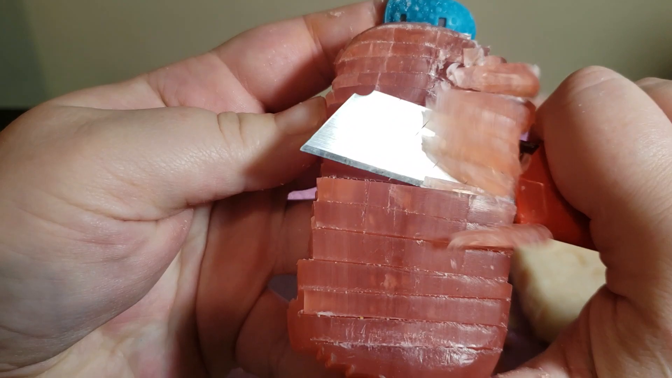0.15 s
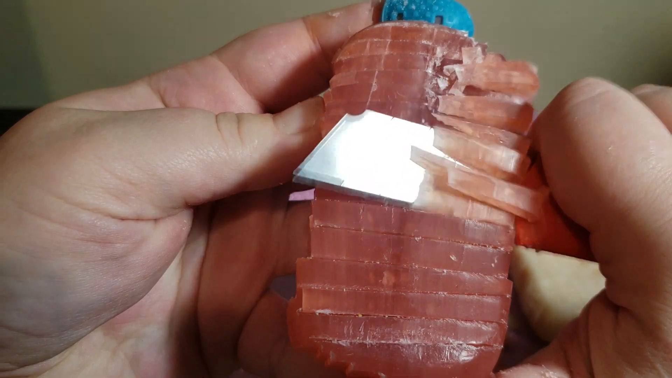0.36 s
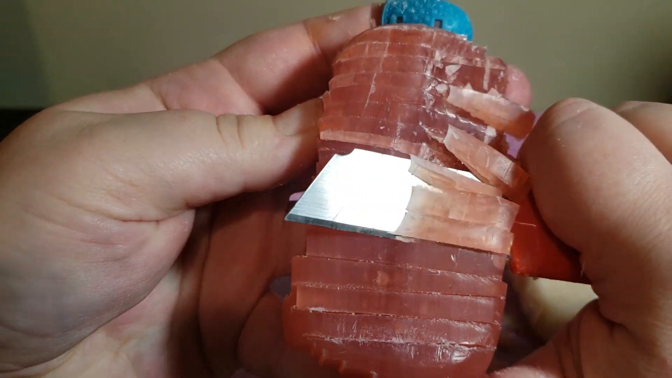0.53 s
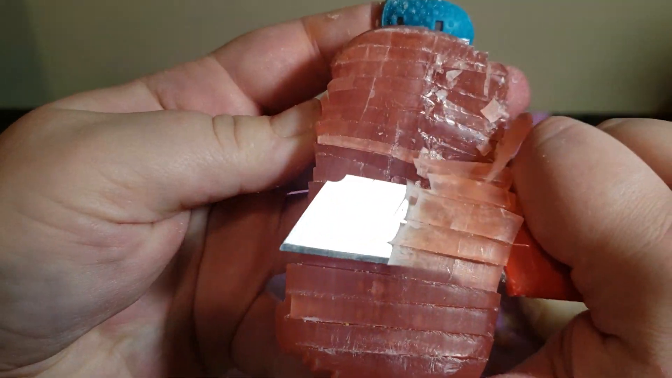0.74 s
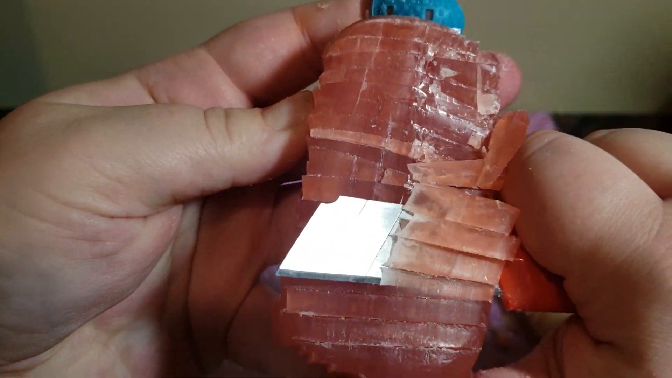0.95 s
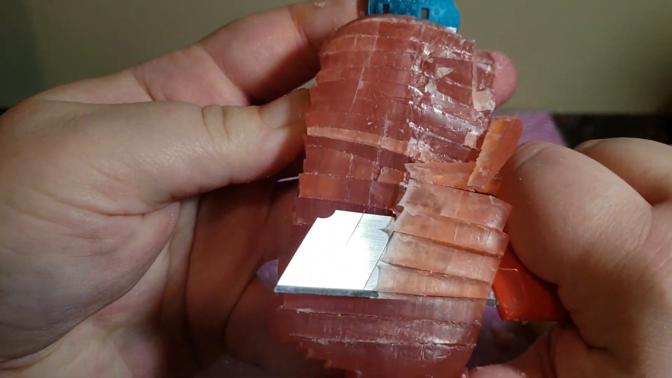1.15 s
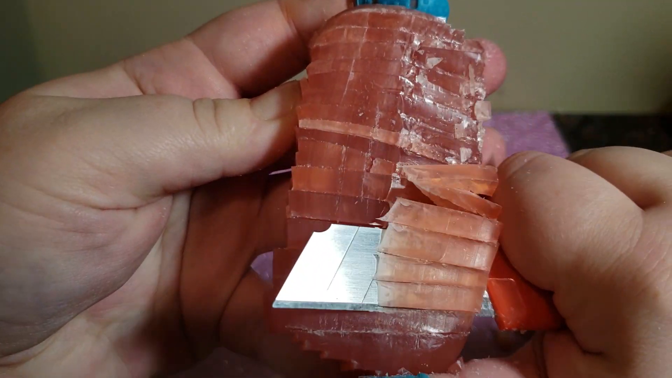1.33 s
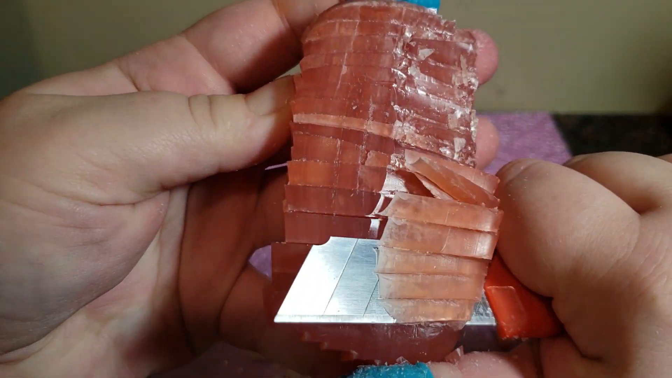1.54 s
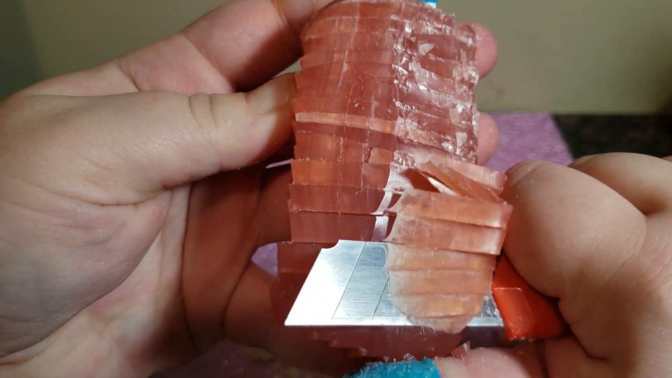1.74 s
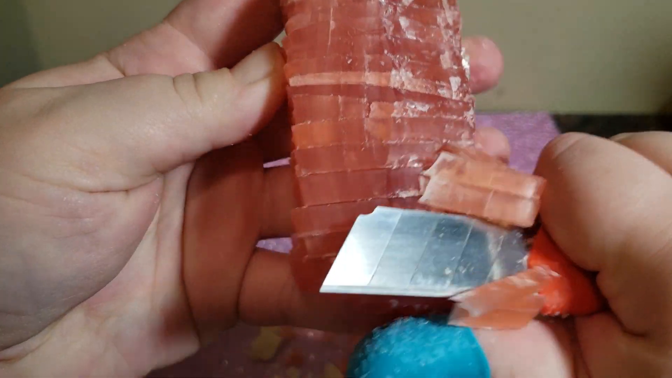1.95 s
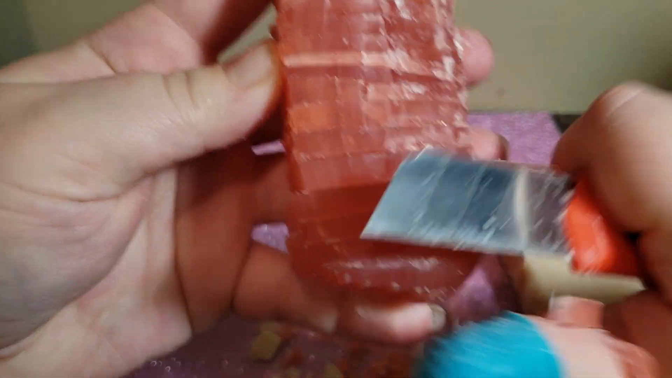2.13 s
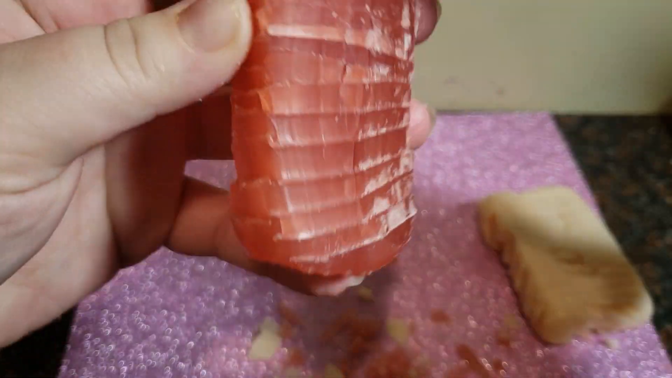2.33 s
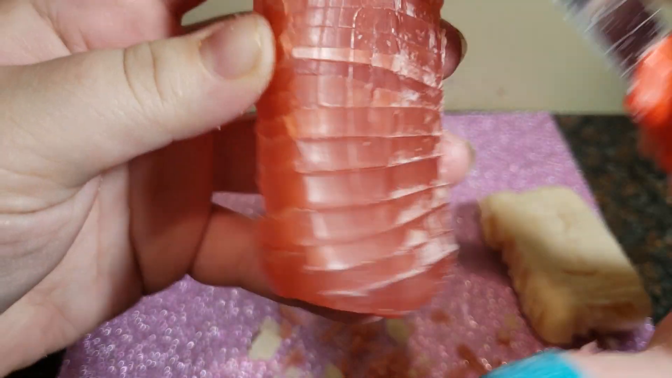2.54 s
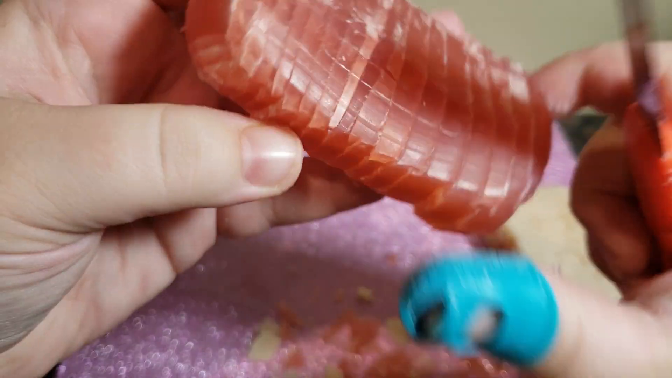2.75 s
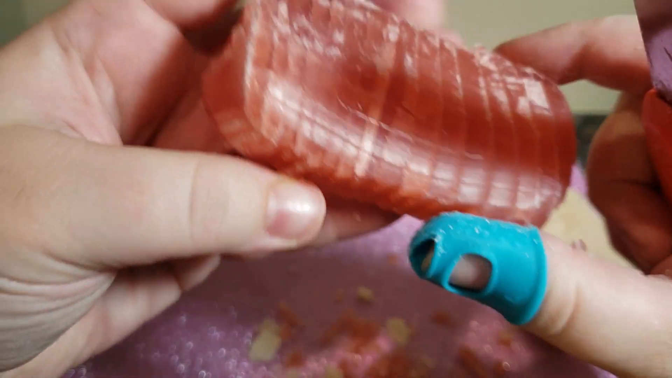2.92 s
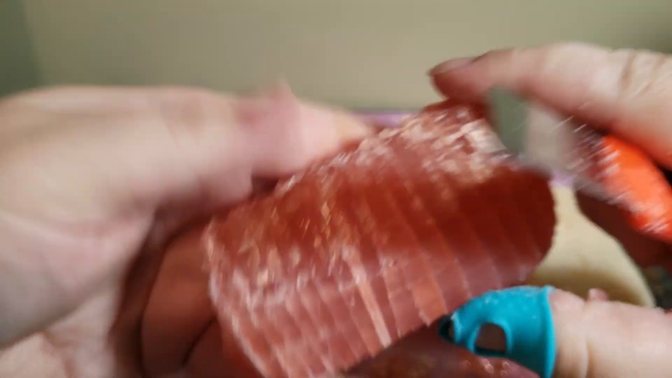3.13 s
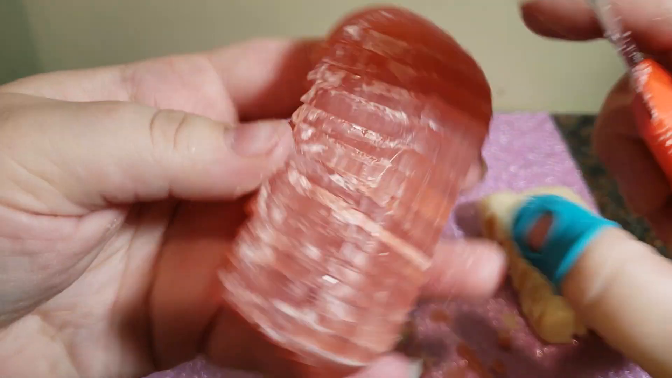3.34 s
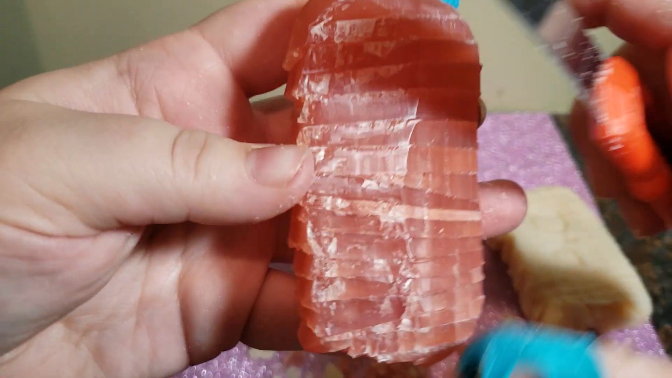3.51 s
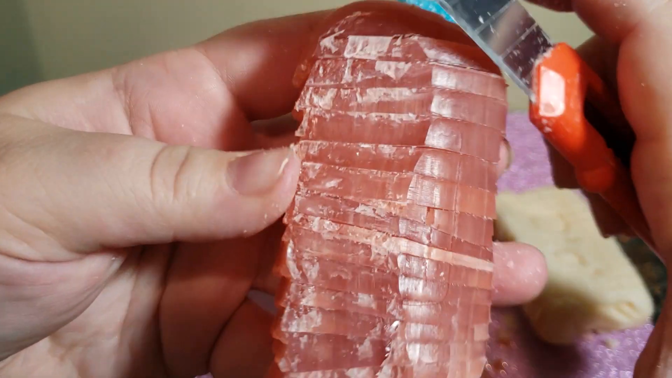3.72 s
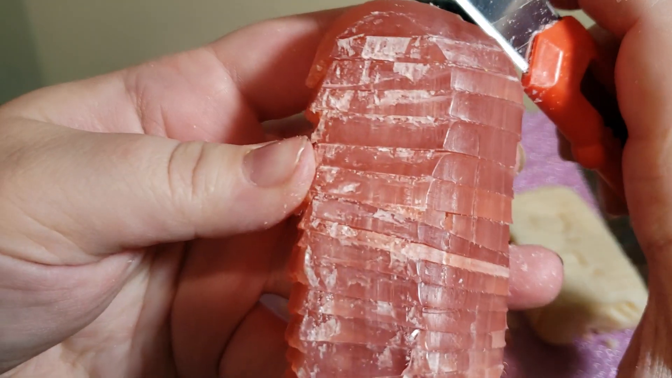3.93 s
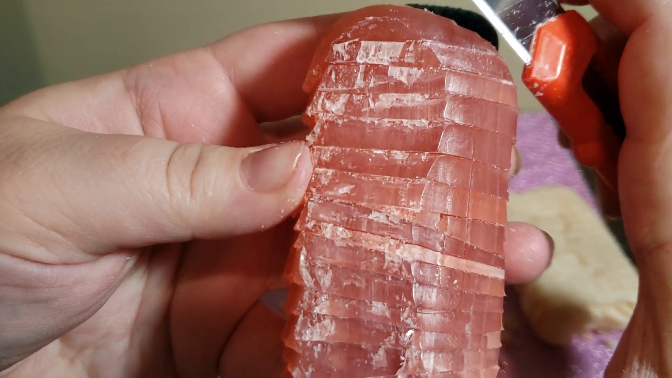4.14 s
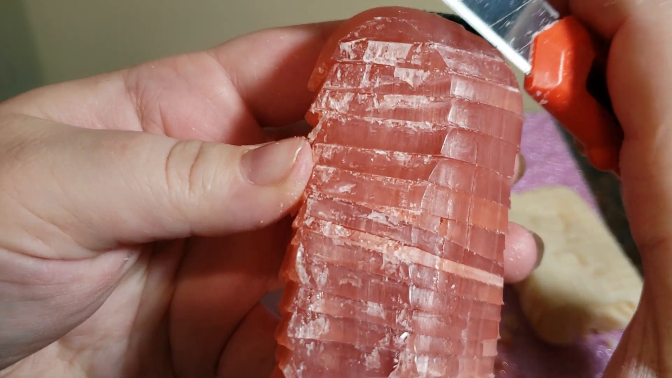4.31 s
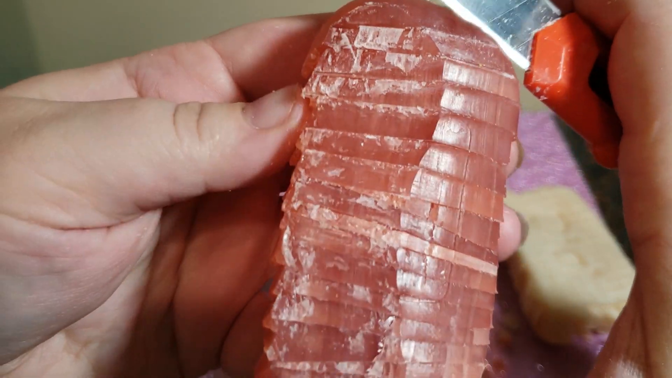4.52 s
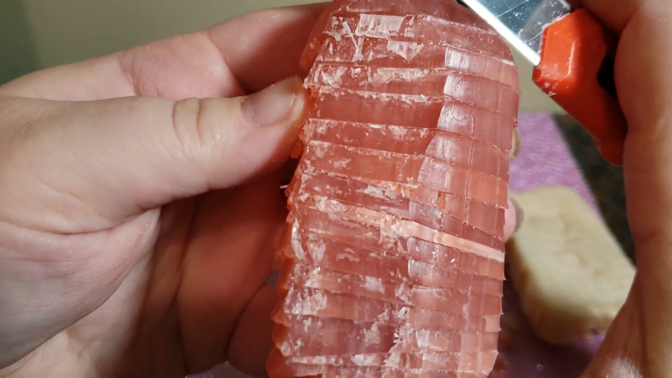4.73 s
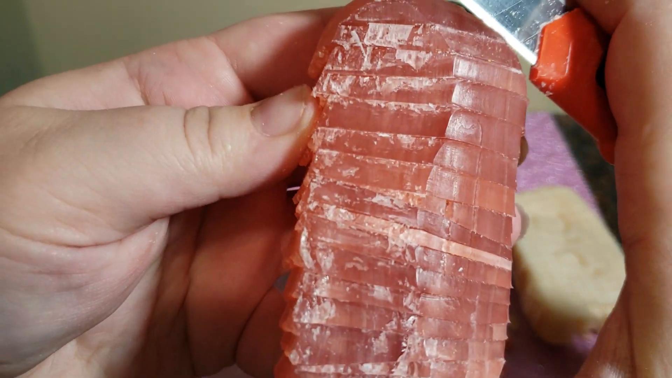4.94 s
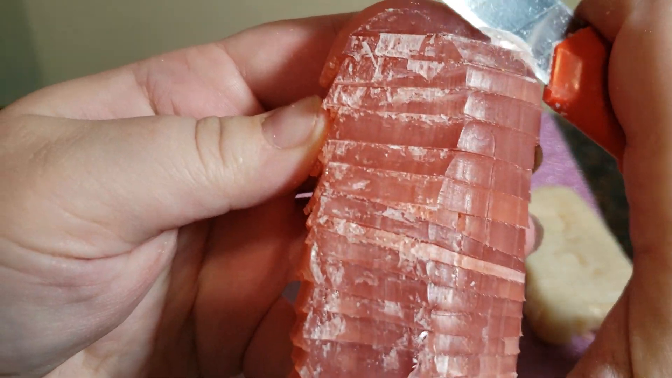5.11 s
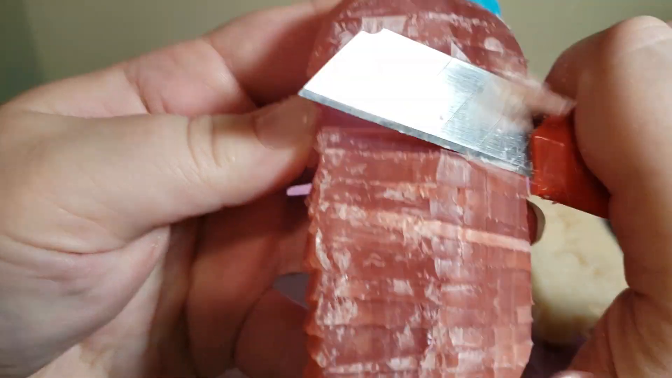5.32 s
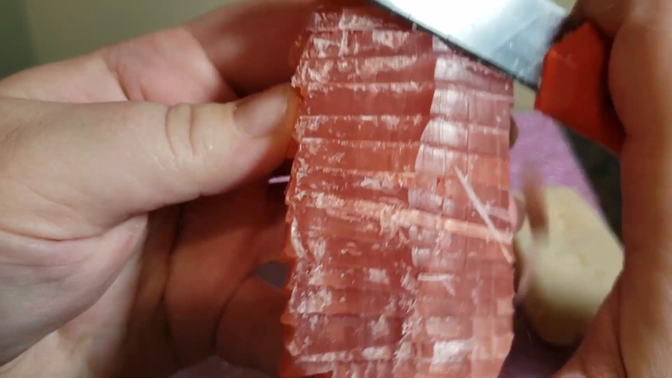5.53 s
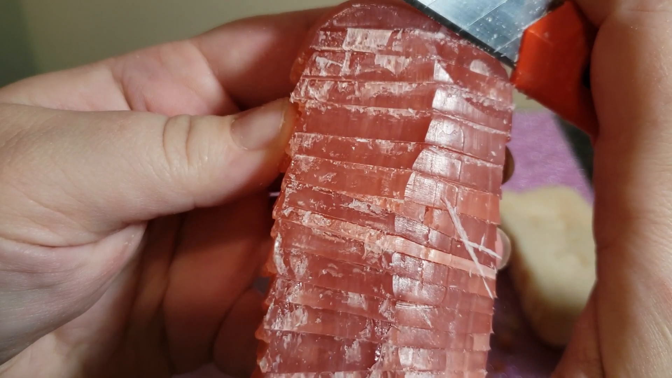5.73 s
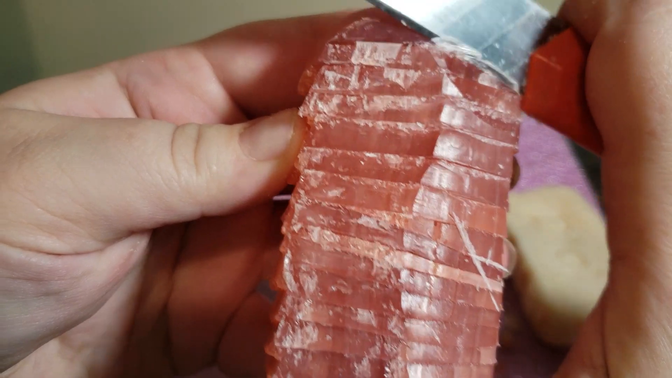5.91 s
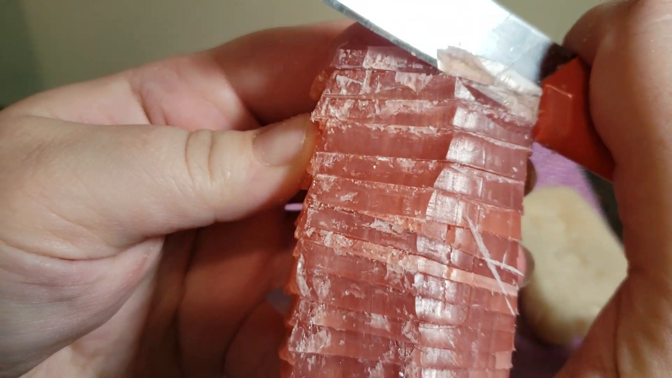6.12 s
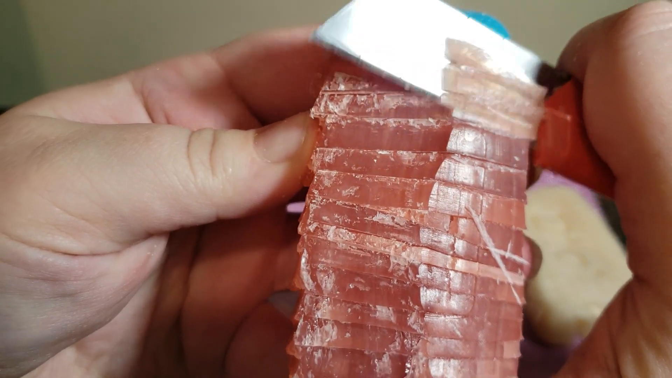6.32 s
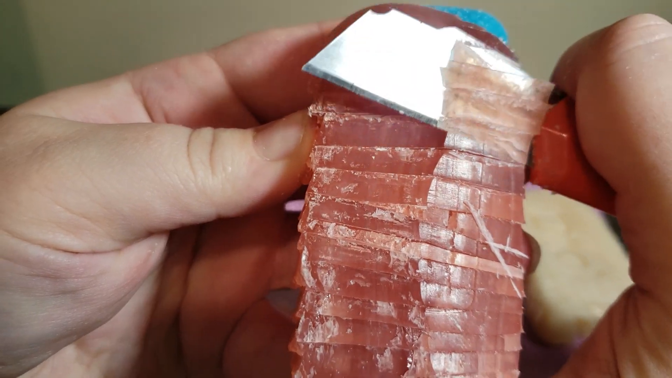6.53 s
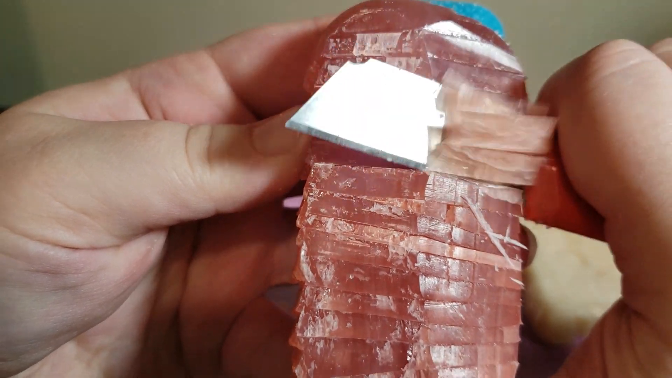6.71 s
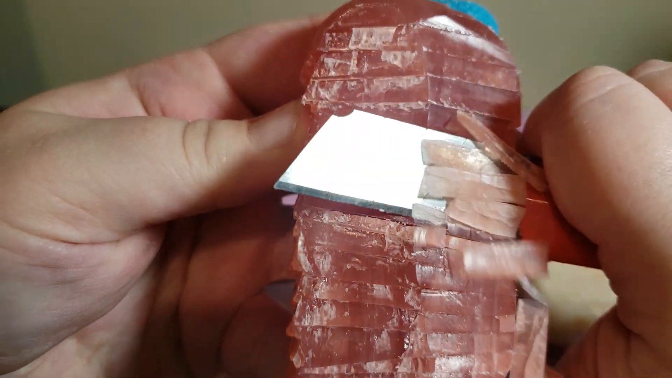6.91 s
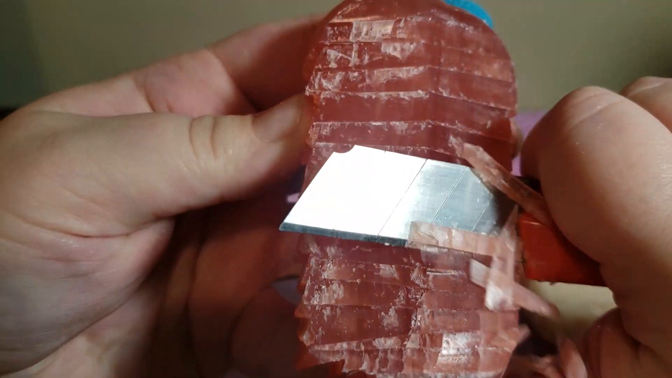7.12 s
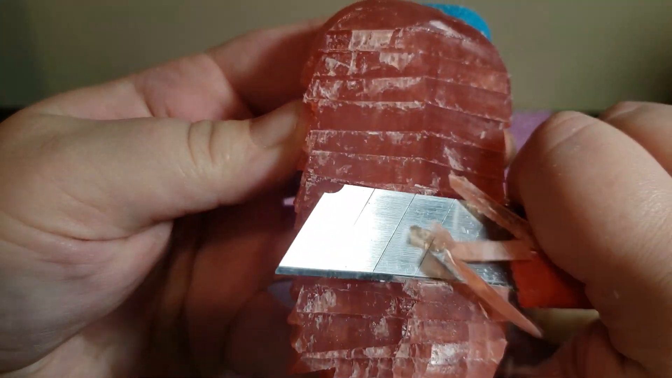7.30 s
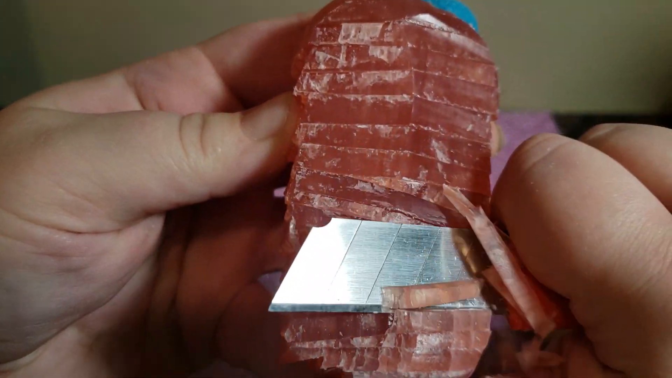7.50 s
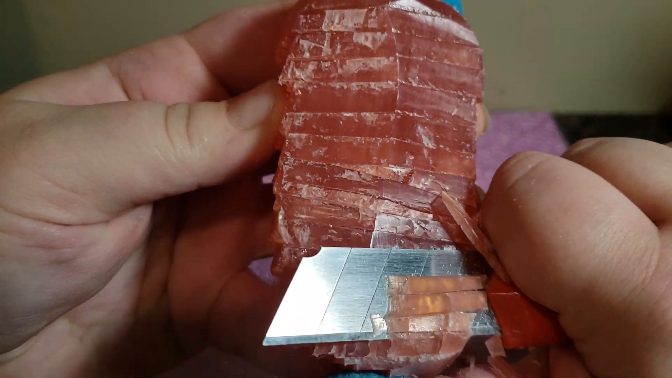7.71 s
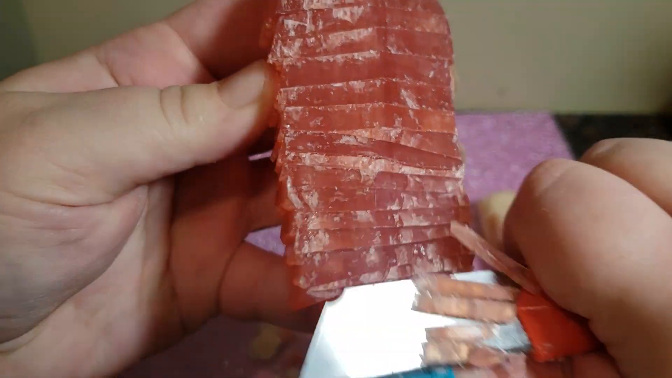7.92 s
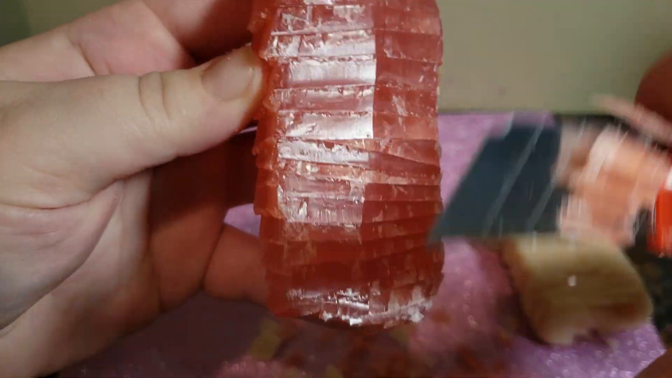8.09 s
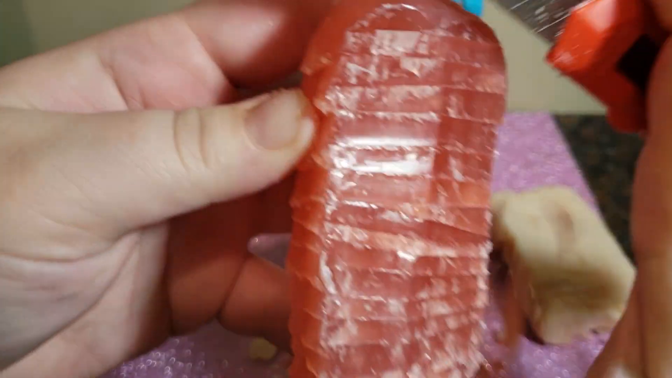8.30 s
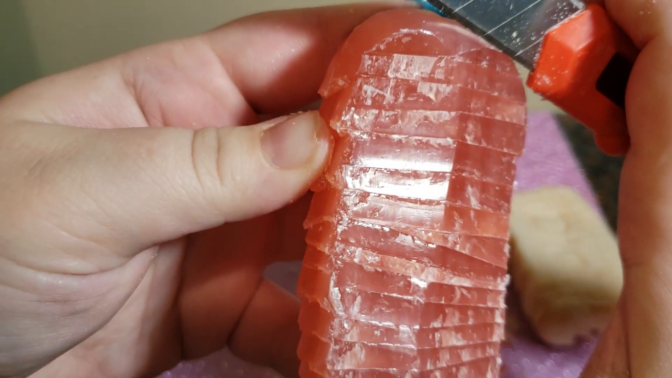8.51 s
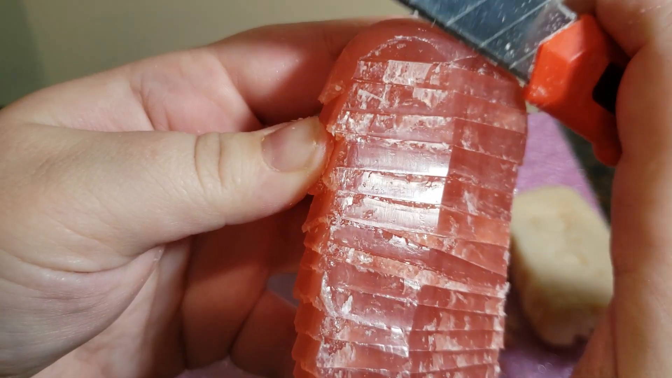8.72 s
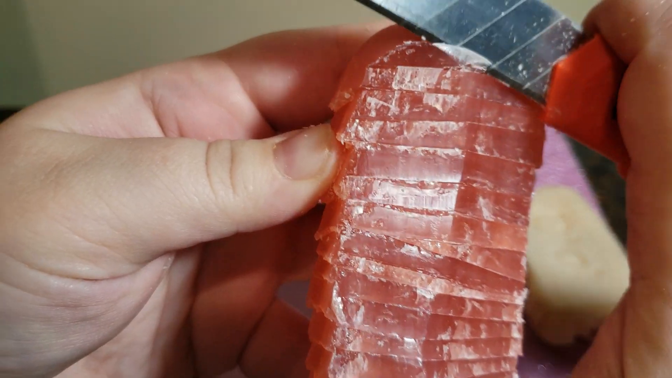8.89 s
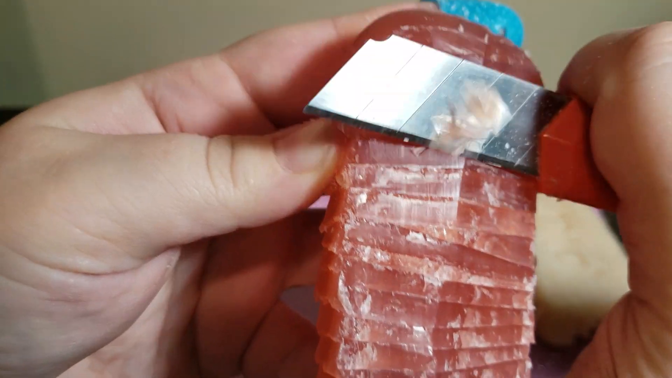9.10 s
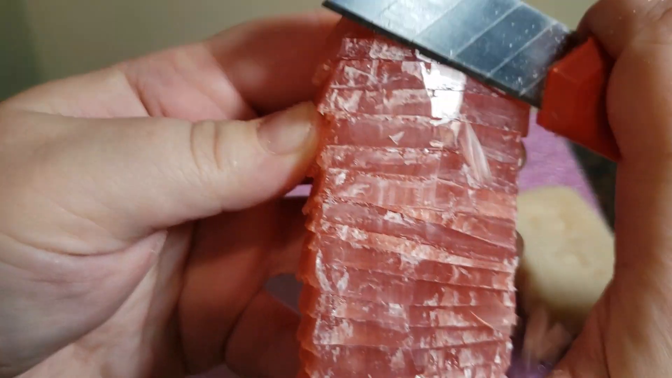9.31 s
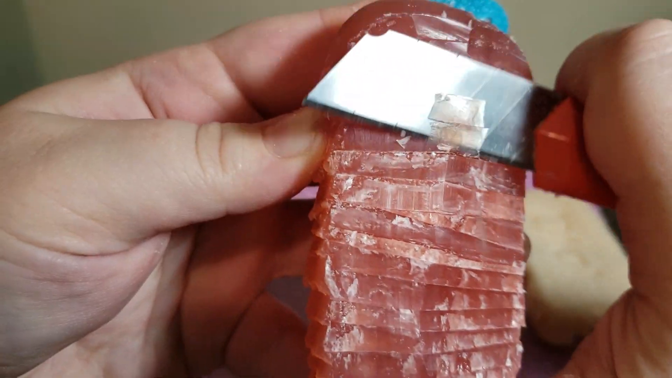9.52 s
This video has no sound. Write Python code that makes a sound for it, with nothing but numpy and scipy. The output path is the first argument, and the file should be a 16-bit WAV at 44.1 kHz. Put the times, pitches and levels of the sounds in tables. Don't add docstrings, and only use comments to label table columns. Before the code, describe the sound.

Close stereo pickup in a small, lightly echoing room, with a faint low appliance hum throughout. A strong brittle crack opens at 0 s, followed by irregular bright snaps near 0.2, 0.4, 0.5, 0.7, 0.9, 1.0 and 1.3 s, with tiny chips and low knocks between. From 2.1 to 2.5 s crumbs and pieces patter, rub and thud softly on the mat. Then it is nearly quiet; between 3.8 and 4.8 s the plastic handle gives small dry ticks. A modest crack comes at 5.35 s, with light scrapes and clicks to 5.8 s. Faint flakes tick from 6.2 s, crumbling grows around 6.8, and a loud snap lands at 7.02 s. More cracks follow at 7.3, 7.45, 7.5 and 7.6 s. Shavings rustle near 8 s, small crunches and knocks cluster at 8.4-8.6 s, then sparse faint clicks and a slight scrape fade around 9.1 s, leaving the hum.

```python
import sys
import numpy as np
from scipy import signal
from scipy.fft import rfft, irfft, next_fast_len
from scipy.io import wavfile
from scipy.ndimage import uniform_filter1d

SR = 44100
rng = np.random.default_rng(int(sys.argv[2]) if len(sys.argv) > 2 else 0)


def how_loud(loudness_db):
    steps = np.asarray(loudness_db, float) / 20
    return 10 ** steps


def generate_wav(sig):
    pcm = np.round(np.clip(np.atleast_2d(sig).T, -1, 1) * 32767).astype(np.int16)
    wavfile.write(sys.argv[1], SR, pcm)


N = 421155
BURST = 2048
FREQS = np.arange(BURST // 2 + 1) * SR / BURST


def level(x, db):
    return x * how_loud(db) / np.sqrt(np.mean(x ** 2))


def ring(f, hz, width):
    return 1j * f * width / (hz ** 2 - f ** 2 + 1j * f * width)


def walk(rate):
    k = int(SR / rate)
    steps = np.repeat(rng.standard_normal(N // k + 1), k)
    return uniform_filter1d(uniform_filter1d(steps, k), k)[:N]


def add(out, s, sound):
    i = int(s * SR)
    sound, i = sound[..., max(-i, 0):], max(i, 0)
    out[..., i:i + sound.shape[-1]] += sound[..., :N - i]


def burst(out, s, ms, colours, dbs, count=20, scatter_db=2.5, slope_db=-17, after_ms=2.2, trail=1.6,
          wet_db=0, near_db=-22, near_t60=.05, pan_db=0, mat_db=-99):
    t = np.arange(BURST) / SR
    when, size, sign = rng.random((3, count))
    when = (2 * when - 1) * (np.arange(count) > 0)
    size = how_loud(slope_db * np.abs(when) - scatter_db * np.log(1 - size) + 2.5 * (when == 0))
    size = size * np.sign(sign - .5)
    lead_ms = 0.9 * np.clip(ms - .5, .05, 8)
    lags = (lead_ms + when * np.where(when < 0, lead_ms, after_ms + trail * ms)) / 1000
    run = size @ np.exp(-2j * np.pi * np.outer(lags, FREQS))
    run = run * (1 + how_loud(mat_db) * np.exp(-2j * np.pi * FREQS * 6.1 / 1000))
    parts = irfft(run * np.array(colours))
    gains = how_loud(dbs) / np.abs(parts).max(axis=1)

    delay = np.exp(-2j * np.pi * lags[0] * FREQS)
    strength = np.sqrt(np.sum(size ** 2))
    blur = irfft(gains @ colours * delay) * strength
    near = rng.standard_normal((2, BURST)) * how_loud(near_db - 60 * t / near_t60)
    near = signal.fftconvolve(blur[None], near, axes=1)[:, :BURST]
    far_gains = gains * how_loud([0, -1])[:len(gains)]
    far = irfft(far_gains @ colours * delay) * strength
    direct = (gains @ parts + near) * how_loud([[pan_db / 2], [-pan_db / 2]])
    add(out, s - lags[0], np.vstack([direct, how_loud(wet_db) * far]))


# (frequency [Hz], width [Hz], share [gain])
BAR_MODES = [
    (3550, 190, 0.73),
    (5000, 2000, .6),
]


def crack(out, s, db, hz, edge_db, q, ms, bar=0, **echo):
    f = FREQS
    edge = ring(f, 8900, 5200) * ring(f, 11000, 11000)
    broad = ring(f, 6000, 2400) * ring(f, 7100, 4600)
    strip = ring(f, hz, hz / q) * ring(f, hz, 2.2 * hz) + np.exp(-q / 2) * broad
    own = sum(0.48 * ring(f, m, m / 16) for m in 3100 * 2.7 ** rng.random(5))
    whole = sum(bar * share * ring(f, m, width) for m, width, share in BAR_MODES)
    burst(out, s, ms, [strip * (1 + own + whole), edge], db - 3 + np.array([0, edge_db]), **echo)


def build_ms(edge_db):
    return 1.1 - 0.1 * edge_db


def small_crack(out, s, db, hz, edge_db):
    crack(out, s, db, hz, edge_db, 1.5, build_ms(edge_db), near_db=-24.5, wet_db=-1, after_ms=1.2, trail=.6)


# (time [s], peak level [dB], ring [Hz], edge over peak [dB])
SNAPS = [(.0012, -12, 3520, -14.5), (0.1913, -19, 3700, -6), (0.3418, -43, 4530, 0.5),
         (0.406, -17, 4500, -4.5), (0.5221, -14, 3470, -11), (0.713, -33.5, 6600, -7),
         (0.8655, -21.5, 3700, -15), (0.8906, -41, 3700, 3), (1.0195, -29.5, 3840, -6.5),
         (1.0195, -26.5, 7600, -15), (1.291, -18, 3920, -0.5), (1.38, -44.5, 5000, -7.5),
         (1.6803, -48.5, 7200, -5.5), (2.4013, -36.5, 5970, 7.5), (5.3516, -35.5, 6340, 5.5),
         (5.3548, -40, 6140, 4), (5.36, -33.5, 3900, 4), (6.402, -40, 6170, 11), (6.85, -44, 4480, -8.5),
         (7.017, -18, 5600, 4.5), (7.0186, -13.5, 3540, -14), (7.3054, -30.5, 5100, 2),
         (7.308, -31, 3550, -13), (7.451, -33, 3640, -13.5), (7.4525, -21, 4100, -13),
         (7.518, -16, 3940, -16), (7.6035, -24, 4070, -3.5), (7.607, -45, 3850, -6),
         (7.831, -44.5, 4500, 6), (8.645, -48, 4390, -16.5)]
# (time [s], peak level [dB], ring [Hz], edge [dB])
AFTERSNAPS = [
    (1.294, -24.5, 8500, -2.5),
    (1.0215, -29, 4000, -25.5),
    (0.0022, -20, 3800, -28.5),
    (7.5195, -30, 3400, -25.5),
    (7.4535, -28, 4800, -12.5),
]


def snaps():
    out = np.zeros((3, N))
    for s, db, hz, edge_db in SNAPS + AFTERSNAPS:
        crack(out, s, db - .55, hz, edge_db, 1.5, 1.6 + build_ms(edge_db), bar=.9, pan_db=-4,
              near_db=-17, near_t60=.031, mat_db=-12.5)
        if db > -27:
            for late in rng.random(6):
                small_crack(out, s + (.098 + late) * .15, db - 42.5 - 11 * late, 6660, 11)
    return out


# (time [s], peak level [dB], edge [dB])
CHIPS = [(.1861, -37, 15.5), (.4032, -42.5, 22.5), (.8624, -29.5, 8), (1.117, -50, 19), (2.3747, -55, 17),
         (5.3461, -41, -6), (5.407, -46.5, 3.5), (6.4168, -46, 10), (7.152, -44.5, 7.5), (7.4351, -55, 11),
         (7.5997, -45, -7), (7.6317, -40.5, 8), (7.704, -50.5, 10.5), (7.8207, -40, -6),
         (8.184, -49.5, 7.5), (8.265, -50, 5.5), (8.296, -51, -8), (8.4223, -43.5, 14), (8.995, -55.5, -5)]
# (time [s], peak level [dB], edge [dB])
CRUMBS = [
    (.6742, -52, 9),
    (1.5312, -51, 15),
    (2.145, -46.5, -3),
    (2.2124, -42, 7),
    (2.2187, -38, 11.5),
    (2.2688, -55, 7.5),
    (2.369, -51, 6),
    (2.5047, -45, 5.5),
    (8.4163, -56, 14),
    (8.814, -58.5, -6),
]
# (time [s], peak level [dB], edge [dB])
BITES = [(.1778, -48, 8), (.2775, -43.5, 3), (.4928, -41.5, -9.5), (.7678, -37, 13.5), (.8135, -58, 23),
         (1.094, -48, 6.5), (1.1928, -51.5, 15), (1.2333, -65, 20), (1.6748, -57, 14), (1.711, -52.5, 1),
         (1.7421, -54.5, -22), (2.084, -51, 7.5), (2.0992, -48.5, 14.5), (2.3115, -41, 3.5),
         (2.3201, -48.5, 11), (5.2235, -60, 16.5), (5.6523, -42, -5.5), (5.7233, -50.5, 8),
         (6.3834, -61.5, 16), (6.405, -57, -8), (6.6177, -41.5, 21.5), (6.7462, -52, 12),
         (6.7496, -57, 6.5), (7.0142, -37.5, 5.5), (7.2022, -47, 19.5), (8.3017, -51.5, 0),
         (8.4405, -32.5, 3.5), (8.4877, -47, 7), (8.5336, -34, 4.5), (9.0785, -53, 11)]
# (time [s], peak level [dB])
FAINT_BITES = [(0.183, -53), (0.3234, -55), (.3562, -47), (0.398, -58), (0.858, -51), (1.252, -55.5),
               (1.271, -64), (1.647, -64), (1.9757, -67.5), (2.02, -62.5), (2.216, -67), (2.44, -57),
               (2.476, -58), (5.213, -66.5), (5.555, -55.5), (5.728, -57), (6.074, -65), (6.1154, -65),
               (6.1943, -62), (6.2138, -59.5), (6.3649, -58.5), (6.3898, -49), (6.596, -64.5), (6.603, -60.5),
               (6.718, -61.5), (6.7424, -57), (7.001, -63), (7.25, -56.5), (7.8082, -63.5), (8.496, -51)]
# (time [s], peak level [dB], ring [Hz], edge [dB])
GRAINS = [(.695, -49, 7000, 5), (.721, -34.5, 6000, 3), (1.0155, -44, 5000, 7.5), (1.131, -68, 9000, 8),
          (1.144, -65, 9000, 3.5), (1.388, -53, 8000, 5.5), (2.1536, -52, 9600, 6), (2.25, -59, 5000, 3),
          (2.39, -47, 4000, 1), (2.45, -52, 7000, 8), (4.9, -56, 4500, -13.5), (6.279, -67.5, 9100, 12),
          (6.7415, -58, 7020, -3), (6.7498, -45, 7480, 5), (6.779, -46, 3890, -3), (6.791, -47, 4800, -12),
          (6.807, -49, 3810, -10), (6.86, -46, 7530, 5), (6.869, -44, 6510, -5), (6.886, -53.5, 7000, 5),
          (6.9001, -38.5, 3480, 1.5), (6.9437, -50, 3540, -5), (7.48, -51, 9000, 13), (7.684, -54, 7940, 6),
          (8.428, -45, 5000, -1), (8.447, -41, 6050, -1), (8.538, -44, 6000, 3), (8.56, -53, 4200, -0.5),
          (8.65, -58.5, 6400, -7.5), (8.655, -48.5, 2400, -14), (2.108, -58, 5000, 3),
          (2.168, -58, 9000, 0), (2.23, -62, 4500, -3), (2.276, -54, 5000, 0), (2.408, -57, 6000, -1),
          (2.42, -51, 3500, 2), (2.534, -64.5, 1800, -6), (7.318, -36, 1700, -6), (7.349, -51, 1700, -12),
          (7.115, -53, 8000, 6), (7.65, -52, 6000, 5), (8.466, -51, 6500, 1), (5.4442, -52, 4200, -3),
          (5.485, -61, 3480, -8), (5.535, -58, 4000, -10), (5.572, -56, 6380, -2), (5.607, -61, 5900, 3),
          (7.775, -56, 7500, -11), (8.816, -56.5, 2550, -8), (6.92, -58, 3700, -7)]


def small_breaks():
    out = np.zeros((3, N))
    for rows, hz in [(CHIPS, 3930), (CRUMBS, 2070), (BITES, 6600)]:
        for s, db, edge_db in rows:
            small_crack(out, s, db, hz, edge_db)
    for s, db in FAINT_BITES:
        small_crack(out, s, db, 6660, 12.5)
    for row in GRAINS:
        small_crack(out, *row)
    return out


# (time [s], peak level [dB], ring [Hz], edge [dB], ring sharpness Q [1])
TICKS = [(3.024, -57.5, 7400, 0, 1.7), (3.321, -58, 3630, -20.5, 2), (3.828, -48, 2670, -8, 3.1),
         (3.869, -51.5, 2070, -22, 6), (3.896, -58, 2440, -8, 12), (3.9506, -70, 2330, 10.5, 5),
         (4.136, -45.5, 6570, -6, 20), (4.1454, -50.5, 2020, -19, 10), (4.374, -41.5, 2420, -19, 6.6),
         (4.4347, -48, 2440, -18, 11), (4.4418, -44, 2490, -27, 22), (4.4508, -43, 2520, -26, 9.5),
         (4.58, -62.5, 3500, -14, 3.3), (4.6083, -53, 3400, -18, 3), (4.637, -51, 6440, -9, 6.4),
         (4.6442, -39, 2850, -16, 2.1), (4.7716, -51.5, 2170, -21, 7.5), ]


def ticks():
    out = np.zeros((3, N))
    for row in TICKS:
        crack(out, *row, .708, near_db=-22, wet_db=-2.5)
    return out


# (time [s], peak level [dB], ring [Hz])
KNOCKS = [(.188, -32.5, 1660), (0.404, -30, 1610), (.428, -35, 1500), (.52, -28.5, 1740),
          (0.695, -45, 1590), (.862, -52, 1360), (1.019, -39.5, 1420), (1.286, -37, 1340),
          (1.529, -31, 1500), (2.22, -28, 1590), (2.319, -35, 1770), (2.367, -41.5, 1660),
          (2.388, -34, 1750), (4.372, -51, 1960), (5.352, -44, 1700), (5.652, -43, 1800),
          (5.725, -44.5, 1590), (6.615, -51, 1660), (7.013, -47, 1770), (7.199, -37, 1550),
          (7.265, -46, 1490), (7.305, -37, 1570), (7.449, -36.5, 1570), (7.513, -34, 1460),
          (7.6, -36.5, 1350), (7.701, -43, 1500), (8.415, -41.5, 1770), (8.44, -35, 1750),
          (8.487, -42, 1770), (8.5315, -34.5, 1760),
          (-.001, -41, 656), (0.341, -51, 1700), (0.668, -43.5, 483), (.711, -33, 1580), (0.712, -32, 624),
         (1.376, -45, 880), (1.53, -39.5, 723), (2.096, -43.5, 470), (2.102, -37, 596), (2.218, -37, 590),
         (2.318, -54, 1170), (2.402, -32, 1010), (2.504, -48, 573), (5.361, -43, 1250), (7.204, -46, 916),
         (7.305, -38.5, 850), (7.485, -46, 640), (7.823, -40.5, 730), (8.418, -43, 1030), (8.442, -38, 923),
          (.277, -49, 1700), (.342, -51, 1000), (.669, -45, 990), (.864, -49, 734), (1.019, -46.5, 705),
        (1.094, -48.5, 1450), (1.573, -49, 900), (2.099, -43.5, 1860), (2.267, -47, 1820),
        (2.311, -39, 1800), (2.439, -40, 1780), (2.473, -50, 1790), (2.503, -55, 1810),
        (2.532, -50.5, 1300), (2.573, -60, 1820), (3.188, -61, 1289), (5.57, -57, 1000), (5.799, -59, 1500),
        (7.016, -46, 622), (8.427, -41.5, 603), (8.575, -58, 1600), (8.814, -61.5, 1510)]


def knocks():
    out, f = np.zeros((3, N)), FREQS
    body = ring(f, 440, 1300) * ring(f, 430, 1700)
    soft = 1 / (1 + 1j * f / 2600) ** 2
    ms = 1.2
    for s, db, hz in KNOCKS:
        colour = soft * (ring(f, hz, hz / 5) * ring(f, hz, 5.5 * hz) + .24 * body)
        burst(out, s + ms / 1000, ms, [colour], [db - 1], near_db=-34, wet_db=-12, slope_db=-36, after_ms=1.2)
    return out


# (time [s], length [s], level [dB], centre [Hz])
DRAG = [(.236, .12, -88, 9500), (.668, .08, -68, 900), (1.528, .075, -66, 1150), (1.686, .13, -78, 6800),
        (2.134, .064, -65, 11000), (2.09, .46, -68, 1000), (2.12, .41, -76, 8000), (2.505, .07, -71, 1100),
        (3.184, .026, -75, 1250), (5.455, .13, -80, 8800), (5.565, .035, -72, 3200),
        (5.55, .085, -75, 8400), (5.566, .03, -76, 1200), (7.818, .045, -68, 2200), (5.795, .05, -70, 680),
        (5.795, .056, -79, 4200), (6.772, .05, -67, 4200), (6.775, .05, -71, 9000),
        (6.845, .085, -71, 3900), (6.845, .07, -67, 7500), (6.775, .14, -76, 1000), (7.196, .11, -73, 1000),
        (8.158, .13, -77, 4200), (8.41, .1, -70, 2400), (9.096, .06, -79, 9200),
        (7.9, .27, -85, 8400), (6.772, .15, -73, 2800), (5.595, .035, -75, 2300), (8.45, .14, -75, 3500),
        (8.53, .06, -70, 9900), (5.36, .07, -72, 1900), (.41, .08, -68, 910), (1.3, .07, -71, 700),
        (2.138, .065, -73, 3200), (2.265, .03, -71, 1900), (7.705, .045, -76, 1500), (.87, .07, -72, 800)]


def drag():
    out = np.zeros((3, N))
    flicker = how_loud(3.5 * walk(70))
    for s, length, db, hz in DRAG:
        size = int(length * SR)
        hit, power, left, right = rng.random((4, SR))
        grains = (hit < .3 * hz / SR) * how_loud(-2.7 * np.log(1 - .97 * power))
        grit = grains * np.sign([left - .5, right - .5])
        grit = irfft(rfft(grit) * ring(np.arange(SR // 2 + 1), hz, hz / 1.1) ** 2)[:, :size]
        grit = level(grit, db) * signal.windows.tukey(size, .4)
        add(out, s, grit[[0, 1, 0]])
    return out * flicker


# (time [s], width [s], level [dB])
ECHOES = [
    (.021, .004, 3),
    (0.041, .006, 2.5),
    (.07, .008, -1.5),
]
# (frequency [Hz], width [Hz], boost [dB])
PORTS = [
    [(1550, 230, 6), (2400, 3300, -4), (3700, 710, 6.5), (7600, 1700, 4), (5600, 7000, 2.5)],
    [(1550, 250, 3.5), (2730, 200, 3), (3700, 140, 6.5), (7020, 2000, -8.5), (11600, 4800, 12.5)],
]


def space(soap):
    t = np.arange(SR // 2) / SR
    noise = rng.standard_normal((2, 2, SR // 2))
    noise = 0.55 * noise * np.abs(noise) ** 0.9
    dull = signal.sosfilt(signal.butter(2, 6500, fs=SR, output="sos"), noise[0])
    bright = signal.sosfilt(signal.butter(2, 6500, "high", fs=SR, output="sos"), noise[1])
    walls = dull * how_loud(-60 * t / .3) + bright * how_loud(-5 - 60 * t / .18)
    walls = how_loud(-33) * walls * np.clip(t / .0032, 0, 1)
    walls = walls * how_loud(sum(db * np.exp(-((t - s) / w) ** 2) for s, w, db in ECHOES))
    air = soap[:2] + signal.fftconvolve(soap[2:], walls, axes=1)[:, :N]
    ports = [np.prod([1 + (how_loud(db) - 1) * ring(FREQS, hz, w) for hz, w, db in side], axis=0) for side in PORTS]
    ports[0] = ports[0] * np.exp(-2j * np.pi * FREQS * 17 / SR)
    return signal.fftconvolve(air, irfft(ports), axes=1)[:, :N]


# (time [s], left minus right level [dB])
HANDS = [
    (0, 9),
    (1.299, 12),
    (1.899, 15.5),
    (2.599, 8.5),
    (5.003, 10.5),
    (6.299, 10.5),
    (6.901, 12.5),
    (7.9, 10),
    (8.5, 13),
    (9.55, -7),
]


def hands(soap):
    pan_db = np.interp(np.arange(N) / SR, *np.transpose(HANDS))
    bass = signal.sosfilt(signal.butter(1, 650, fs=SR, output="sos"), soap)
    return bass + (soap - bass) * how_loud(np.array([pan_db, -pan_db]) / 2)


# (time [s], peak level [dB], frequency [Hz])
JOLTS = [(0, -41, 59), (0.406, -39.5, 132), (0.525, -42, 91.5), (0.711, -46, 157), (0.879, -46, 62.6),
         (1.015, -45, 84.5), (1.293, -39.5, 73), (1.859, -51.5, 55.1), (2.231, -45.5, 164), (2.4, -44, 134),
         (3.112, -47.5, 110), (5.355, -46, 93), (6.617, -48.5, 78), (7.019, -41, 110), (7.159, -53, 51),
         (7.3, -43.5, 167), (7.524, -43.5, 130), (8.439, -49, 164)]


def jolts():
    out, t = np.zeros(N), np.arange(BURST * 4) / SR
    fade = how_loud(-60 * t / .13)
    table_top = how_loud(-5) * fade * np.sin(2 * np.pi * 270 * t)
    for s, db, hz in JOLTS:
        shake = fade * np.sin(2 * np.pi * hz * t) + table_top
        add(out, s, how_loud(db) * (1 - np.exp(-t / .00047)) * shake)
    out = signal.sosfilt(signal.butter(2, 40, "high", fs=SR, output="sos"), out)
    return out * how_loud([[-2.5], [2.5]])


def shaped(gain):
    size = next_fast_len(N)
    f = np.arange(1, size // 2 + 2) * SR / size
    return irfft(rfft(rng.standard_normal(size)) * gain(f), size)[:N]


def colour(table):
    hz, db = np.transpose(table)
    return shaped(lambda f: how_loud(np.interp(np.log(f), np.log(hz), db)))


# (frequency [Hz], level per Hz [dB])
QUIET_MID = [(20, -54), (48, -17.5), (80, -20), (118, -3), (170, -8), (250, -15), (300, -23), (420, -23),
             (490, -34.5), (900, -41), (3000, -46), (9000, -48), (15500, -44.5), (16100, -64.5)]
# (frequency [Hz], level per Hz [dB])
QUIET_SIDE = [(15, -41.5), (25, -32), (53, -5.5), (288, -4), (368, -10.5), (433, -6), (553, -22),
              (979, -23), (2600, -27), (15200, -29), (16100, -48)]
# (frequency [Hz], width [Hz], level [dB])
HUM = [
    (110, 64, -66.5),
    (306.5, 34, -71),
    (61.7, 4.7, -72),
]


def background():
    mid = level(colour(QUIET_MID), -59.5)
    for hz, width, db in HUM:
        mid = mid + level(shaped(lambda f: ring(f, hz, width) ** 2), db)
    turns = np.cumsum(212.8 + .8 * walk(3)) / SR
    mid = mid + level(np.sin(2 * np.pi * turns), -60) * how_loud(.7 * walk(6))
    deep = signal.sosfilt(signal.butter(2, 90, fs=SR, output="sos"), mid)
    side = level(colour(QUIET_SIDE), -70.5) - 0.26 * deep
    return np.array([mid + side, mid - side])


def scene():
    soap = snaps() + small_breaks() + ticks() + knocks() + drag()
    return hands(space(soap)) + jolts() + background()


def low_pass(x):
    return signal.sosfilt(signal.butter(12, 17030, fs=SR, output="sos"), x)


def record(dry):
    top = signal.ellip(8, .2, 60, 16400, fs=SR, output="sos")
    mix = signal.sosfilt(top, dry)
    return low_pass(mix)


dry = scene()
out = record(dry)
generate_wav(out)
```